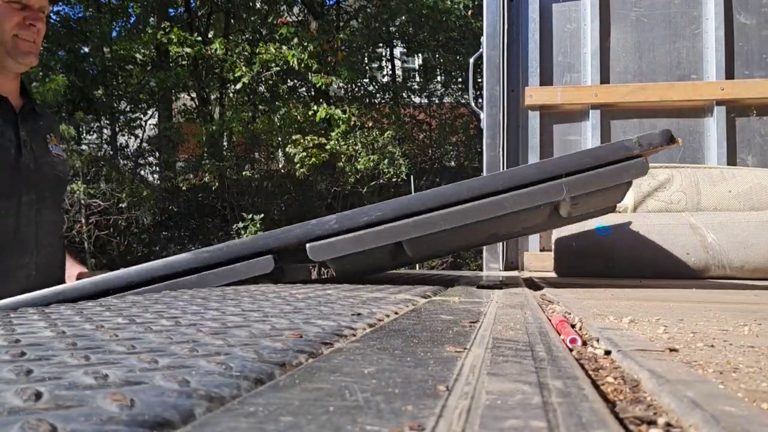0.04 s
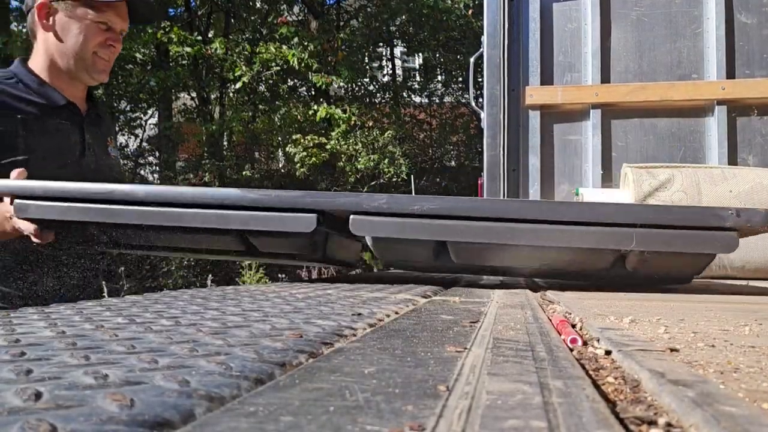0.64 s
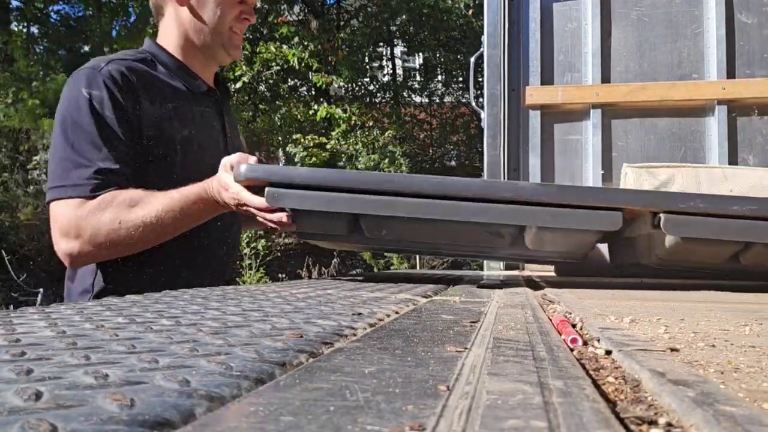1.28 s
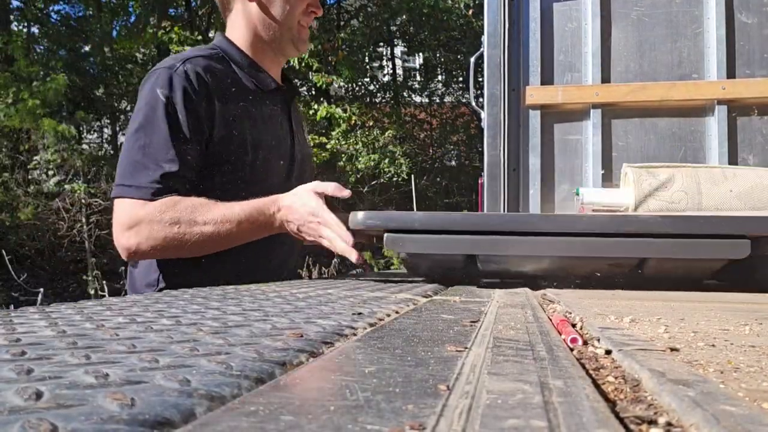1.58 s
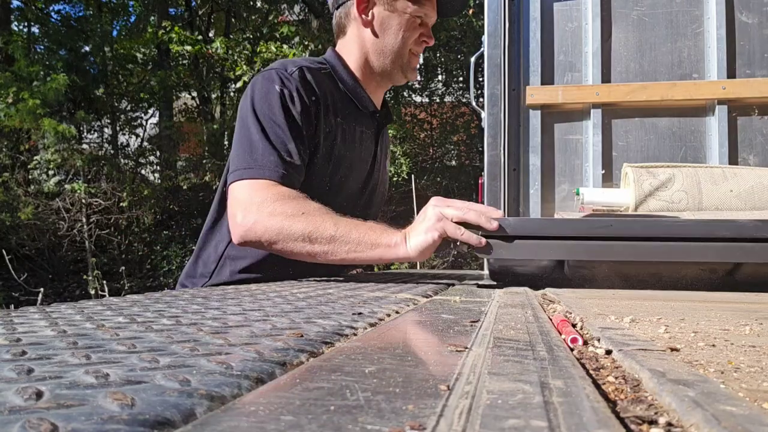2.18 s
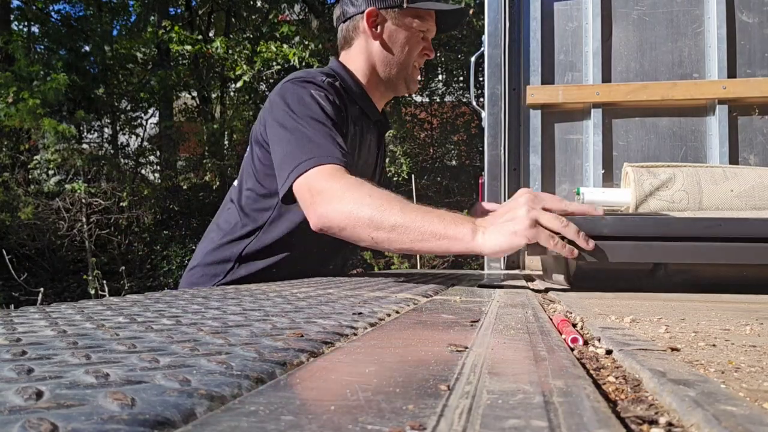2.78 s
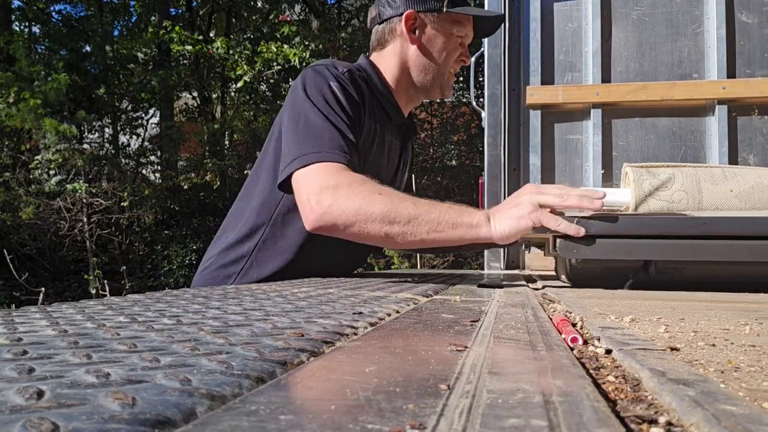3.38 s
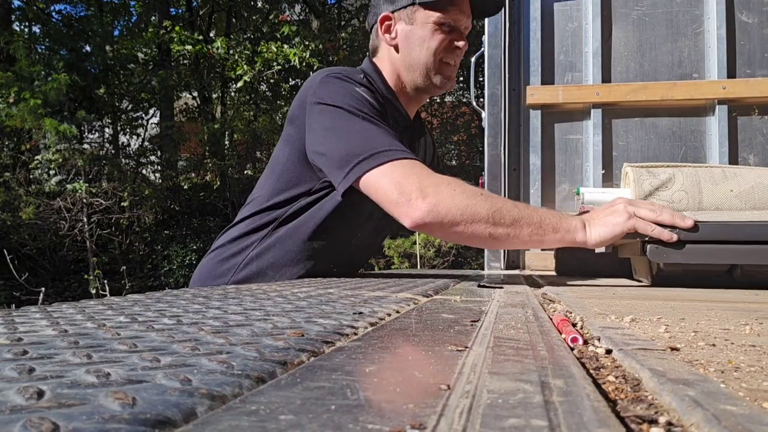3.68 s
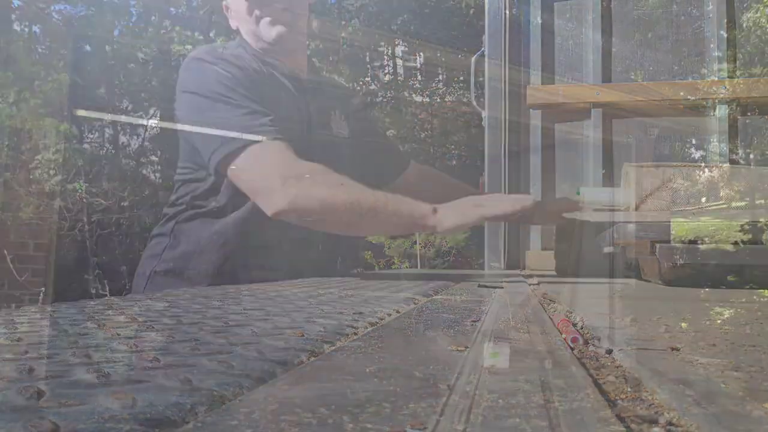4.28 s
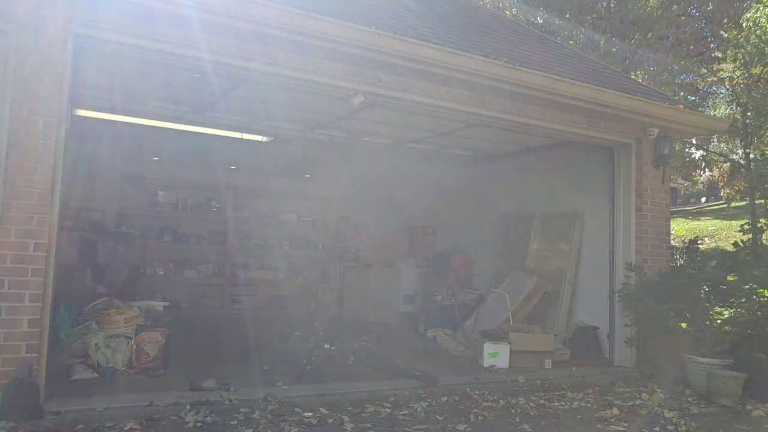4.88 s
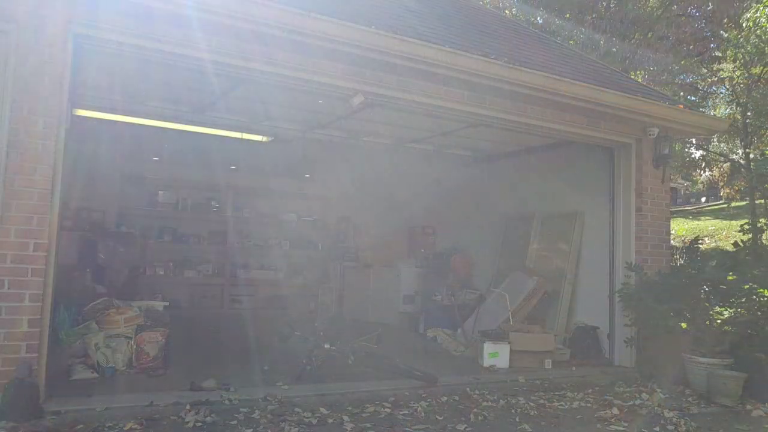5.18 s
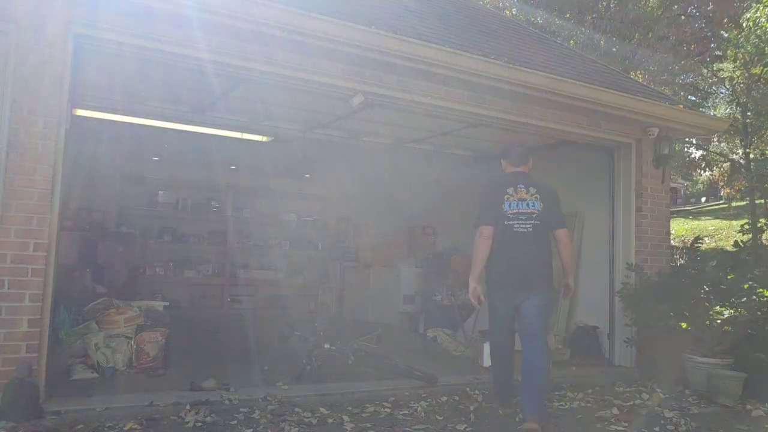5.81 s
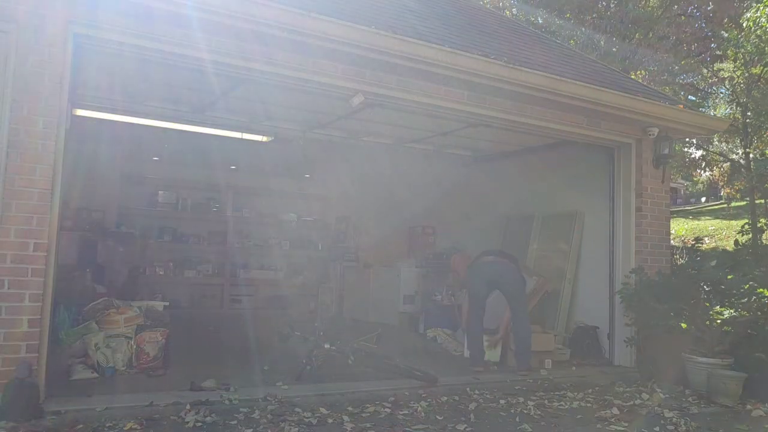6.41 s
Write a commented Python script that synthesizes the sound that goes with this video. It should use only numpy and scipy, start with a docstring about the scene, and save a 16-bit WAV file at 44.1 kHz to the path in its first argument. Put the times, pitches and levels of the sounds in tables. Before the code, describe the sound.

A heavy, hollow plastic panel knocks and judders close by on a metal truck floor, landing with a deep boom. It drops again with a sharp clack and a clink of metal, then scrapes over grit in several shoves, with a short echo from the truck's walls. Afterwards shoes slap and crunch past on leafy concrete and fade away. A faint bird whistles over a soft breeze.

```python
"""Hollow knocks and a deep boom: a heavy plastic panel is tipped over the edge of a metal truck floor,
lifted, dropped and pushed in with a series of shoves. Blows ring its shell, landings bend it and make it
judder, and its underside scrapes over grit. Then shoes slap and crunch past on a leafy concrete drive
and walk away. A bird whistles in the trees, over a low rumble of air and a rustle of leaves."""
import sys
import numpy as np
from scipy import signal
from scipy.fft import rfft, irfft, next_fast_len
from scipy.io import wavfile
from scipy.ndimage import uniform_filter1d, map_coordinates

SR = 44100
rng = np.random.default_rng(int(sys.argv[2]) if len(sys.argv) > 2 else 0)


def generate_wav(signal):
    """Clip the signal to [-1, 1] and save it as 16-bit WAV at the path in sys.argv[1]."""
    frames = np.transpose(np.atleast_2d(signal))
    scaled = np.clip(frames, -1, 1) * 32767
    pcm = np.round(scaled).astype(np.int16)
    wavfile.write(sys.argv[1], SR, pcm)


N = 284445


# The shell hits the floor: start_s, shell_db, favoured_hz, clack_db
SHELL_HITS = [(0.068, -27, 300, -47), (0.096, -21.5, 298, -29), (0.117, -20.5, 173, -47),
              (0.154, -24, 242, -23.5), (0.173, -19, 282, -25.5), (0.206, -11, 257, -21),
              (0.236, -16, 292, -27.5), (0.354, -16.5, 294, -27), (0.384, -28, 245, -24),
              (0.402, -18, 240, -27.5), (0.48, -17, 257, -27.5), (0.63, -15, 224, -18.5),
              (0.657, -16.5, 248, -15), (0.707, -11.5, 323, -17.5), (0.736, -15.5, 447, -29),
              (1.095, -35.5, 348, -36), (1.365, -33.5, 450, -40), (1.694, -10, 430, -12),
              (1.726, -24, 400, -37), (1.781, -14.5, 401, -17), (1.843, -19, 720, -29),
              (1.91, -35.5, 440, -31), (1.957, -21.5, 410, -23.5), (2.58, -38, 390, -32.5),
              (2.762, -37.5, 400, -30.5)]
# Ring of the hollow shell: pitch_hz, level_db, t60_s
SHELL_MODES = [(150, -10, .27), (179, -3, .25), (200, 0, .38), (228, 1.5, .37), (276, 1.5, .28),
               (304, -3, .26), (400, -3, .19), (474, -2.5, .3), (509, -11, .28), (590, -11, .25),
               (622, -4.5, .3), (707, 3, .16), (764, -2.5, .13), (888, -3, .18), (990, -7, .25),
               (1360, -12, .14), (1495, -5, .12), (1805, -7, .12), (2408, -8, .12), (2790, 0, .12),
               (3700, -4, .12), (4130, -8, .1)]
# Boxy body of the shell: freq_hz, level_db
HOLLOW_EQ = [(70, -1.5), (110, 4), (160, 1), (250, -4.5), (350, -7), (480, -5), (700, -7), (1000, -17.5),
             (1300, -34)]
# Hard edge of plastic on metal: freq_hz, level_db
CLACK_EQ = [(650, 2.5), (1100, 3.5), (1260, -2.5), (1760, 3), (1990, -2), (2440, -0.5), (3190, -7.5),
            (3690, -2.5), (4990, -21.5), (5340, -16), (9560, -27.5), (14300, -35.5), (16000, -43)]
def knocks():
    """Each blow rings the hollow shell, thuds through its crowded modes and clacks on the floor."""
    ring, thud_power, clack_power = np.zeros((3, N))
    t = np.arange(SR // 2) / SR
    for start_s, shell_db, favoured_hz, clack_db in SHELL_HITS:
        modes = ringing(SHELL_MODES, t, favoured_hz, octaves=0.58, vary_db=2.0)
        add(ring, start_s, amp(shell_db) * modes * (1 - fade(t, 0.017)))
        add(thud_power, start_s, (amp(shell_db - 3.0) * fade(t, t60=0.22)) ** 2)
        add(clack_power, start_s, (amp(clack_db) * (fade(t, 0.044) + 0.21 * fade(t, 0.34))) ** 2)
    thud = colour(np.sqrt(thud_power) * rng.standard_normal(N), HOLLOW_EQ)
    clack = colour(np.sqrt(clack_power) * grains(9000, spread_db=7.5), CLACK_EQ)
    return ring + thud + clack


# The panel's weight comes down: start_s, judder_s, boom_db, decay_ratio, chatter_db, rasp_db
PANEL_LANDINGS = [(0.004, 0.048, -25.5, 0.51, -42, -52), (0.113, 0.26, -20, 0.64, -23.5, -39),
                  (0.391, 0.091, -24.5, 0.5, -18, -34.5), (0.63, 0.12, -8, .31, -12, -32.5),
                  (1.096, 0.038, -32.5, 0.75, -26.5, -47), (1.697, 0.21, -17.5, 1, -11.5, -34.5)]
# Flex of the whole panel, the lowest two modes beating: pitch_hz, level_db, free_t60_s
BENDING_MODES = [(52.7, -2.5, 3.7), (65, 2, 2.25), (72.24, -2, 1.84), (91.8, 2, 1.7), (122.8, -8, 1.3)]
def boom():
    """Each landing bends the whole panel; hands damp it until they let go, then it throbs on."""
    track = np.zeros(N)
    t = np.arange(2 * SR) / SR
    for start_s, _, boom_db, decay_ratio, _, _ in PANEL_LANDINGS:
        bending = sum(amp(db) * np.sin(2 * np.pi * hz * t) * fade(t, free_t60 * decay_ratio)
                      for hz, db, free_t60 in BENDING_MODES)
        add(track, start_s, amp(boom_db - 2.0) * bending * (1 - fade(t, 0.014)))
    return track


def judder():
    """After each landing the ribs chatter on the floor in quick uneven slips."""
    rise_s, sag_db_per_s = 0.0045, 23.5
    t = np.arange(SR) / SR
    chatter, rasp = np.zeros((2, N))
    for start_s, judder_s, _, _, chatter_db, rasp_db in PANEL_LANDINGS:
        envelope = gate(t, rise_s, judder_s, rise_s, t60=0.5) * amp(-sag_db_per_s * t)
        add(chatter, start_s, amp(chatter_db) * envelope)
        add(rasp, start_s, amp(rasp_db) * envelope)
    slips = unit(amp(5.2 * wobble(110)))
    body = rubbed_shell(chatter * slips * grains(1000, spread_db=3), HOLLOW_EQ, ring_db=-8, favoured_hz=356)
    edge = colour(rasp * slips * grains(4000, spread_db=6), CLACK_EQ)
    return amp(-7) * body + amp(-2) * edge


# Scraping pushes, whose cues may overlap or cross:
# onset_s, swell_cue_s, release_s, drag_db, scrape_db, grit_db
PANEL_SHOVES = [(0.0, 0.015, 0.81, -40.5, -57, -65.5), (0.884, 0.935, 0.94, -55, -78.5, -63),
                (0.994, 1.015, 1.114, -44.5, -53.5, -53), (1.14, 1.13, 1.136, -39, -41.5, -46),
                (1.316, 1.385, 1.347, -42.5, -49.5, -47), (1.49, 1.47, 1.526, -33, -38, -36.5),
                (1.648, 1.65, 1.91, -34, -40.5, -37.5), (2.15, 2.291, 2.444, -36.5, -43.5, -46),
                (2.426, 2.52, 2.5, -31.5, -39.5, -48), (2.54, 2.588, 2.7, -41, -51, -60),
                (2.843, 2.916, 2.95, -33.5, -36.5, -44), (3, 3.03, 2.998, -25, -34.5, -42),
                (3.225, 3.275, 3.415, -38, -43, -46), (3.37, 3.43, 3.83, -39.5, -43, -46),
                (3.597, 3.7, 3.722, -28.5, -34.5, -39.5), (3.761, 3.78, 3.82, -27.5, -40.5, -42.5)]
def shove_envelopes():
    """Gains of drag, scrape and grit: each shove rises and dies away, the longer ones swelling on the way."""
    swell_db = 5
    t = np.arange(N) / SR
    power = np.zeros((3, N))
    for onset_s, swell_cue_s, release_s, *levels_db in PANEL_SHOVES:
        effort = amp(swell_db * np.interp(t, [onset_s, swell_cue_s, release_s], [-1, 0, -1]))
        motion = gate(t, onset_s, release_s, rise=0.062, t60=0.34)
        power += (amp(levels_db)[:, None] * effort * motion) ** 2
    return np.sqrt(power)


# Hollow drag of the shell: freq_hz, level_db
DRAG_EQ = [(40, -14), (65, 1), (105, -8), (150, -2), (210, -5), (280, -1), (400, .5), (480, 1), (570, -4.5),
           (720, -4.5), (1000, -9.5), (1400, -22)]
# Rasp of the underside: freq_hz, level_db
SCRAPE_EQ = [(1200, 6.5), (1450, -0.5), (2000, 7), (2900, 3), (4000, 1), (5000, -4), (5600, -4), (7400, -6),
             (9500, -18.5)]
# Sizzle of fine grit: freq_hz, level_db
GRIT_EQ = [(3000, -26), (5500, -2), (7500, 1), (10000, -3), (12500, 1.5), (15500, 4.5)]
def sliding(shoves):
    """The underside catches on grit: a hollow drag, a scrape and a fine hiss with coarser grains in it."""
    drag, scrape, grit = shoves
    catching = unit(amp(1.66 * wobble(70)))
    coarse = amp(-8) * grains(110, spread_db=3)
    body = rubbed_shell(drag * catching * grains(2500, spread_db=3), DRAG_EQ, ring_db=-5, favoured_hz=406)
    rasp = colour(scrape * catching * (grains(7000, spread_db=7) + coarse), SCRAPE_EQ)
    hiss = colour(grit * catching * (grains(9000, spread_db=1.5) + coarse), GRIT_EQ)
    return body + shifting_contact(rasp + hiss, depth_db=4.0)


def rubbed_shell(force, eq, ring_db, favoured_hz):
    """Friction drives the shell's broad response and its modes."""
    impulse = ringing(SHELL_MODES, np.arange(SR // 2) / SR, favoured_hz, octaves=1.0, vary_db=-1.5)
    ring = signal.fftconvolve(force, impulse / np.linalg.norm(impulse))[:N]
    return colour(force, eq) + amp(ring_db) * ring


# Grit cracks under the rim: start_s, level_db
GRIT_SNAPS = [(0.17, -36), (0.356, -37), (0.401, -55), (0.48, -34), (0.632, -22.5), (0.646, -28),
              (0.656, -26), (0.708, -20.5), (0.92, -32.5), (1.365, -17), (1.374, -24.5), (1.457, -25.5),
              (1.494, -25), (1.526, -27), (1.69, -11), (1.781, -15.5), (1.959, -16.5), (2.491, -33.5),
              (2.659, -40), (2.761, -34.5), (3.651, -28)]
# Lower bite of a snap: freq_hz, level_db
SNAP_EQ = [(400, -22), (900, 10.5), (2000, -5), (3800, 6), (6000, -3), (10000, -5)]
def grit_snaps():
    """Grains of grit crack in a few milliseconds: a bright tick over a lower snap."""
    bright, low = np.zeros((2, N))
    t = np.arange(SR // 10) / SR
    for start_s, level_db in GRIT_SNAPS:
        add(bright, start_s, amp(level_db) * fade(t, 0.021) * rng.standard_normal(len(t)))
        add(low, start_s, amp(level_db - 2) * fade(t, 0.018) * rng.standard_normal(len(t)))
    return colour(bright, GRIT_EQ) + colour(low, SNAP_EQ)


# The rim clips the sill: start_s, level_db, favoured_hz
SILL_TAPS = [(1.366, -36, 4900), (1.694, -16, 1600), (1.782, -19, 1720), (2.58, -28, 1400),
             (4.017, -42.5, 1300)]
# Clink of the metal sill: pitch_hz, level_db, t60_s
SILL_MODES = [(958, 5, 0.041), (1240, -11.5, 0.05), (1475, -7.5, .06), (1750, -12, 0.16), (2070, 2, 0.045),
              (2325, -2, 0.039), (2840, 0.5, 0.077), (3470, 1.5, .07), (4470, -9, .05), (5227, -0.5, 0.13),
              (5534, -12, .05), (6368, -10.5, .06)]
def sill_taps():
    """The metal sill rings briefly where the rim catches it."""
    track = np.zeros(N)
    t = np.arange(SR // 4) / SR
    for start_s, level_db, favoured_hz in SILL_TAPS:
        add(track, start_s, amp(level_db) * ringing(SILL_MODES, t, favoured_hz, octaves=0.9, vary_db=2))
    return track


# Thin resonances of the rim: pitch_hz, width_hz, level_db
RIM_RESONANCES = [(2020, 130, 4), (2600, 49, -2), (6100, 100, -2), (7030, 300, -10)]
def rim_squeak(peak_s, half_width_s, level_db):
    """The rim rubs with a brief rough squeak as the panel is levelled."""
    def rim(hz):
        return sum(amp(db) * 1j * hz * width / (pitch ** 2 - hz ** 2 + 1j * hz * width)
                   for pitch, width, db in RIM_RESONANCES)
    swell = np.exp(-((np.arange(N) / SR - peak_s) / half_width_s) ** 2)
    return amp(level_db) * swell * unit(filtered(grains(1100, spread_db=11), rim))


def panel_contacts(shoves):
    """All the contacts between panel and floor, with fresh grain on every call."""
    squeak = rim_squeak(peak_s=1.13, half_width_s=0.035, level_db=-41)
    return knocks() + sill_taps() + grit_snaps() + judder() + sliding(shoves) + squeak


# Heels, soles and scuffs: peak_s, rise_s, t60_s, level_db, brightness_db
FOOTFALLS = [(4.153, .01, 0.079, -60, 0), (4.353, 0.005, 0.056, -56.5, 9), (4.39, 0.037, 0.28, -64, -9),
             (4.528, 0.005, 0.06, -31.5, -3), (4.572, 0.026, 0.39, -44.5, -6),
             (4.646, 0.012, 0.21, -39, -8), (4.669, 0.025, 0.35, -41, -7), (4.851, 0.0087, 0.09, -43, -1.5),
             (4.945, .04, 0.37, -55, -6), (4.995, 0.013, .11, -27.5, -7), (5.133, 0.0098, .052, -66.5, 12),
             (5.25, 0.038, 0.18, -77.5, 10.5), (5.32, 0.0028, 0.038, -64, 10), (5.469, .008, .33, -63, 0.5),
             (5.666, .007, 0.13, -50.5, 0), (5.686, 0.0089, 0.15, -49, 1.5), (5.804, 0.0065, .19, -57, 4.5),
             (5.916, .007, .2, -54.5, 2.5), (6.16, 0.0022, .11, -58.5, -2), (6.203, .005, .12, -58.5, -3),
             (6.359, .024, .32, -60.5, -6)]
def step_envelopes():
    """Gains of sole, leaves and sand: a flat step is dull, a glancing one bright."""
    t = np.arange(N) / SR
    power = np.zeros((3, N))
    for peak_s, rise_s, t60_s, level_db, brightness_db in FOOTFALLS:
        gains = amp([level_db - brightness_db, level_db, level_db + brightness_db])
        power += (gains[:, None] * gate(t, peak_s, peak_s, rise_s, t60_s)) ** 2
    return np.sqrt(power)


# Dull slap of a sole: freq_hz, level_db
SOLE_EQ = [(40, -1), (80, -12.5), (160, -2), (210, -3.5), (300, -3.5), (450, -5.5), (650, -2), (850, -7.5),
           (1100, -2.5), (1500, -2.5), (2000, -24.5)]
# Crackle of dry leaves: freq_hz, level_db
CRUNCH_EQ = [(1500, -8), (2000, 1), (2300, -2), (2900, -1.5), (3600, 0), (4500, -7.5), (5000, -11),
             (6200, -13), (7500, -8.5), (9000, -28)]
def footsteps(steps):
    """Each shoe presses down, slaps the concrete and crushes sand and dry leaves."""
    sole, crunch, grit = steps
    slap = amp(4) * colour(sole * rng.standard_normal(N), SOLE_EQ)
    leaves = amp(5.5) * colour(crunch * grains(9000, spread_db=-8), CRUNCH_EQ)
    sand = amp(6) * colour(grit * grains(9000, spread_db=10.5), GRIT_EQ)
    return slap + shifting_contact(leaves + sand, depth_db=4.5)


# Falling whistles: start_s, length_s, start_hz, end_hz, level_db
BIRD_WHISTLES = [(0.85, .1, 3320, 3030, -55), (4.41, .06, 3380, 2950, -58), (5.387, .11, 3670, 2900, -53),
                 (5.7, .08, 3350, 2800, -52), (6.269, .07, 3320, 2940, -55)]
def bird():
    """Thin whistles slide down and flutter in the trees."""
    song = np.zeros(N)
    for start_s, length_s, start_hz, end_hz, level_db in BIRD_WHISTLES:
        progress = np.linspace(0, 1, int(length_s * SR))
        phase = 2 * np.pi * np.cumsum(start_hz + (end_hz - start_hz) * progress) / SR
        arch = np.sqrt(np.abs(np.sin(np.pi * progress)))
        add(song, start_s, amp(level_db) * arch * np.sin(phase))
    return song * amp(3 * wobble(120))


# Bed of open air and leaves: freq_hz, level_db
BREEZE_EQ = [(12, -37), (20, -8.5), (86, 1.5), (198, -14), (377, -25.5), (422, -24), (558, -22.5),
             (949, -24.5), (1030, -32), (2080, -32), (2320, -31.5), (5080, -35.5), (6010, -38),
             (13200, -52.5), (16000, -57)]
def breeze():
    """A low rumble of air, nearly alike on both sides, under a wide rustle of leaves."""
    mid, side = [colour(rng.standard_normal(N), BREEZE_EQ) for _ in range(2)]
    width = [(60, 0.11), (400, 0.58), (2000, 1.0)]  # freq_hz, side_to_mid_ratio
    side = filtered(side, lambda hz: along(width, hz))
    return amp(-50 + 1.2 * wobble(3)) * np.array([mid + side, mid - side])


def cargo_box(x):
    """The truck's walls throw back a short, bright reverb."""
    walls = [(80, -35), (300, 1), (4000, 5.5), (14000, -1.5)]  # freq_hz, level_db
    return amp(-9.5) * filtered(echoes(x, t60=0.23), lambda hz: amp(along(walls, hz)))


def echoes(x, t60):
    """A diffuse stereo tail, drawn afresh for each block: its paths change as the source moves."""
    hop = 2048
    t = np.arange(int((min(t60, 0.5) + 0.01) * SR)) / SR
    shape = fade(t, t60) * (1 - fade(t, 0.011))
    window = signal.get_window("cosine", 2 * hop)
    x = np.pad(x, (hop, 2 * hop))
    wet = np.zeros((2, len(x) + len(t)))
    for start in range(0, N + hop, hop):
        tail = rng.standard_normal((2, len(t))) * shape / np.linalg.norm(shape)
        piece = signal.fftconvolve([x[start:start + 2 * hop] * window], tail, axes=1)
        wet[:, start:start + piece.shape[1]] += piece
    return wet[:, hop:hop + N]


# Path of the action across the stereo field: time_s, left_lead_ms
PAN_PATH = [(0, -0.091), (0.85, -0.21), (1.2, 0.26), (1.8, 0.13), (3.0, .25), (3.8, 0.26), (5.0, 0.382),
            (5.7, 0.16), (6.45, 0.18)]
# Sound that differs between the sides: freq_hz, power_share
DIFFUSE_SHARE = [(60, 0.038), (250, 0.11), (600, 0.29), (1000, 0.65), (2000, 0.6), (6000, 0.78),
                 (15000, 0.38)]
# Leftward tilt at a lean of 1: freq_hz, left_minus_right_db
LEFT_TILT = [(60, 12), (300, 5), (1000, 7), (2500, -1), (5000, 14), (9000, 14.5), (15000, 6)]
def placed(direct, scattered, lean):
    """Direct sound reaches one side first, scattered sound widens it, and the blend leans left."""
    def diffuse(hz):
        return np.clip(along(DIFFUSE_SHARE, hz), 0, 1)
    sides = np.array([[0.5], [-0.5]])
    n = np.arange(N)
    lead_samples = np.interp(n / SR, *np.transpose(PAN_PATH)) * SR / 1000
    pair = np.array([map_coordinates(direct, [n + side * lead_samples], order=5) for side in sides])
    focused = filtered(pair, lambda hz: np.sqrt(1 - diffuse(hz)))
    wide = filtered(scattered, lambda hz: np.sqrt(diffuse(hz)))
    return filtered(focused + wide, lambda hz: amp(sides * lean * along(LEFT_TILT, hz)))


def shifting_contact(x, depth_db):
    """The contact shifts, so resonances of the scrape come and go."""
    spectra = signal.stft(x, nperseg=512)[2]
    patches = uniform_filter1d(rng.standard_normal(spectra.shape), size=3, axis=0)  # across frequency
    patches = uniform_filter1d(patches, size=14, axis=1)  # across time
    return signal.istft(spectra * amp(depth_db * unit(patches)), nperseg=512)[1][:N]


def ringing(modes, t, favoured_hz, octaves, vary_db):
    """One blow on a body: the contact point favours the modes around one pitch."""
    hz, db, t60 = np.transpose(modes)
    gains = amp(db + vary_db * rng.standard_normal(len(hz))) * rng.choice([-1, 1], len(hz))
    gains /= 1 + (np.log2(hz / favoured_hz) / octaves) ** 2
    gains /= np.sqrt(np.sum(gains ** 2) / 2)
    return sum(g * np.sin(2 * np.pi * f * t) * fade(t, d) for g, f, d in zip(gains, hz, t60))


def grains(per_s, spread_db):
    """Tiny contacts at random times and of uneven size, rms 1."""
    hits = rng.random(N) < per_s / SR
    return unit(hits * rng.standard_normal(N) * amp(spread_db * np.clip(rng.standard_normal(N), -2, 2)))


def wobble(knots_per_s):
    """A smooth random curve."""
    knots = rng.standard_normal(int(N * knots_per_s / SR) + 4)
    return map_coordinates(knots, [np.arange(N) * knots_per_s / SR])


def gate(t, onset, release, rise, t60):
    """An envelope that rises toward onset and dies away from release."""
    attack = np.exp(-(np.minimum(t - onset, 0) / max(rise, 1e-3)) ** 2)
    return attack * fade(np.maximum(t - release, 0), t60)


def fade(t, t60):
    """Exponential decay, 60 dB down after t60 seconds."""
    return np.exp(-np.log(1000) * t / max(t60, 1e-3))


def colour(x, eq):
    """Causal EQ that keeps the power of white noise; it falls 30 dB an octave outside its points."""
    size = 8192
    hz = np.fft.rfftfreq(size, 1 / SR) + 1
    octaves_outside = np.abs(np.log2(hz / np.clip(hz, eq[0][0], eq[-1][0])))
    gain = np.maximum(amp(along(eq, hz) - 30 * octaves_outside), 1e-6)
    cepstrum = irfft(np.log(gain))
    cepstrum[1:size // 2] *= 2  # fold to minimum phase, so attacks stay sharp
    cepstrum[size // 2 + 1:] = 0
    kernel = irfft(np.exp(rfft(cepstrum)))
    return signal.fftconvolve(x, kernel / np.linalg.norm(kernel))[:N]


def filtered(x, response):
    """Shape x by a complex response of frequency."""
    size = next_fast_len(N + SR // 2)
    return irfft(rfft(x, size) * response(np.fft.rfftfreq(size, 1 / SR)), size)[..., :N]


def along(points, hz):
    """Read a curve of (freq_hz, value) points on a log axis."""
    freqs, values = np.transpose(points)
    return np.interp(np.log(hz + 1), np.log(freqs), values)


def add(track, start_s, sound):
    """Mix a sound in at its cue."""
    start = max(round(start_s * SR), 0)
    track[start:start + len(sound)] += sound[:max(N - start, 0)]


def amp(db):
    """Decibels to gain."""
    return 10 ** (np.asarray(db) / 20)


def unit(x):
    """Scale to rms 1."""
    return x / np.sqrt(np.mean(x ** 2) + 1e-20)


def scene():
    """The panel in the cargo box, then the walk up the drive, with bird and breeze behind."""
    shoves, steps = shove_envelopes(), step_envelopes()
    panel = panel_contacts(shoves) + boom()
    reverb = cargo_box(panel)
    scattered = np.array([panel_contacts(shoves), panel_contacts(shoves)])
    truck = amp(-0.5) * placed(panel, scattered, lean=0.75) + reverb
    walk = placed(footsteps(steps), np.array([footsteps(steps), footsteps(steps)]), lean=0.62)
    return truck + walk + echoes(bird(), t60=0.13) + breeze()


def record(dry):
    """Round off the highest peaks and cut the very top of the treble."""
    ceiling, top_hz = 0.92, 16000
    rounded = dry / (1 + np.abs(dry / ceiling) ** 6) ** (1 / 6)
    return filtered(rounded, lambda hz: hz < top_hz)


dry = scene()
out = record(dry)
generate_wav(out)
```